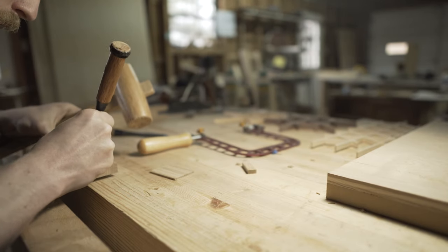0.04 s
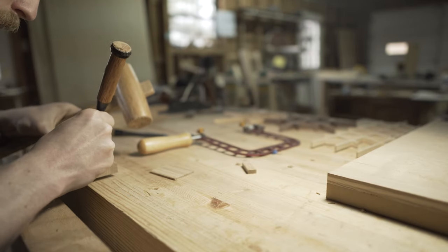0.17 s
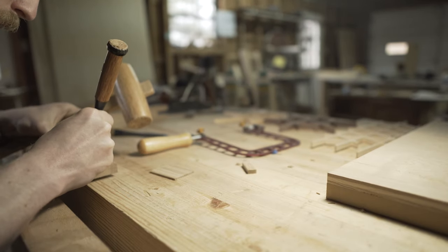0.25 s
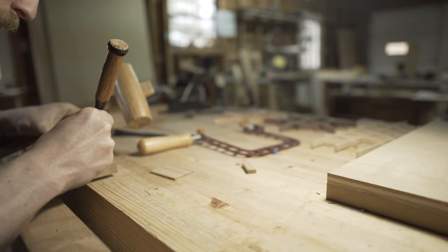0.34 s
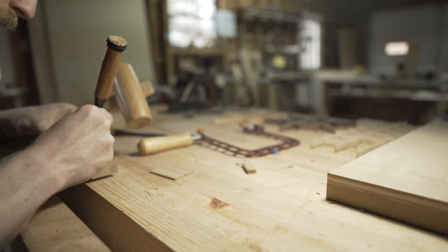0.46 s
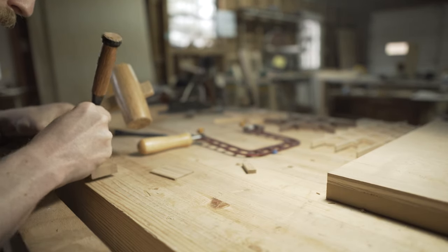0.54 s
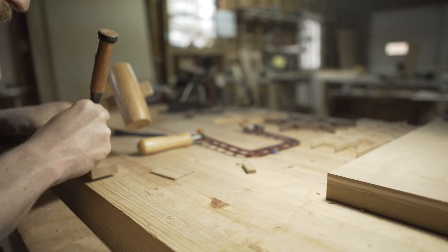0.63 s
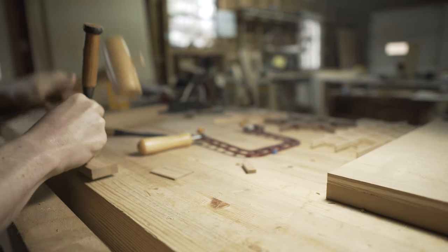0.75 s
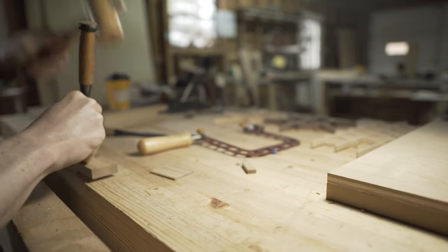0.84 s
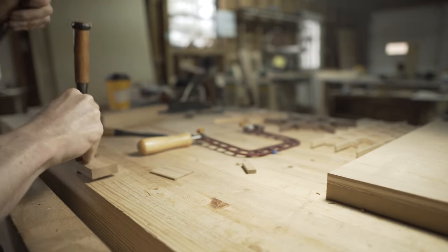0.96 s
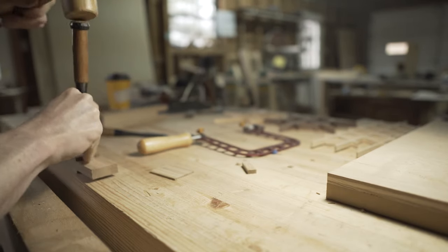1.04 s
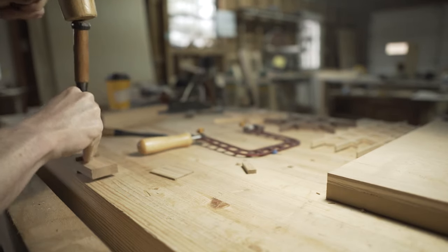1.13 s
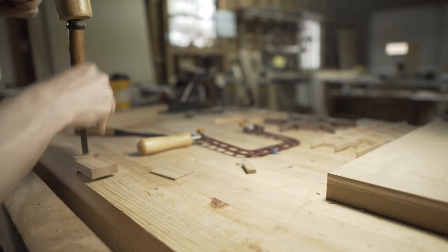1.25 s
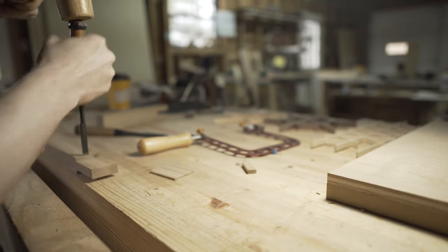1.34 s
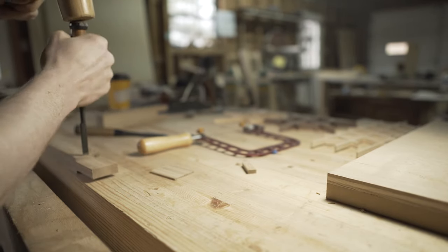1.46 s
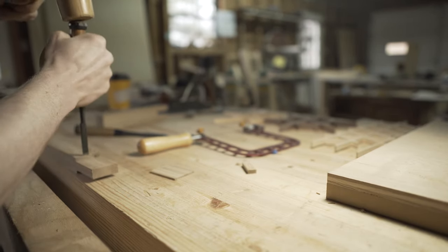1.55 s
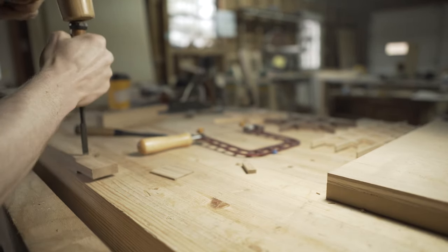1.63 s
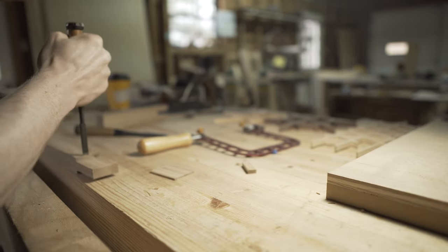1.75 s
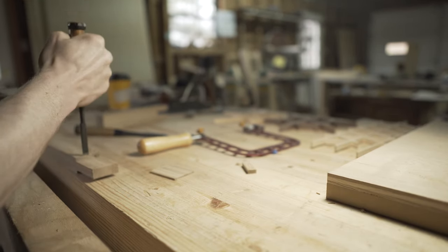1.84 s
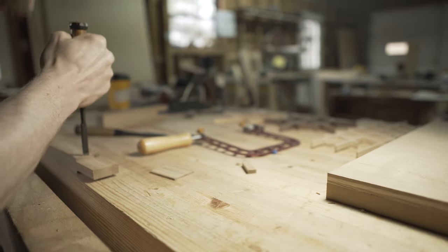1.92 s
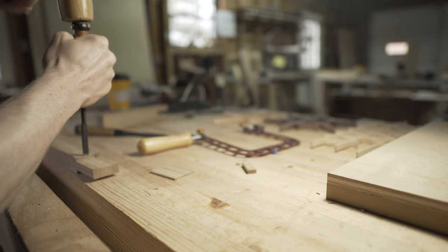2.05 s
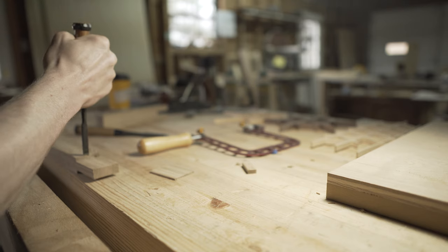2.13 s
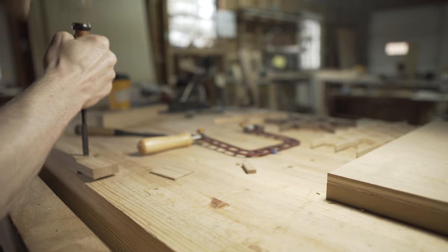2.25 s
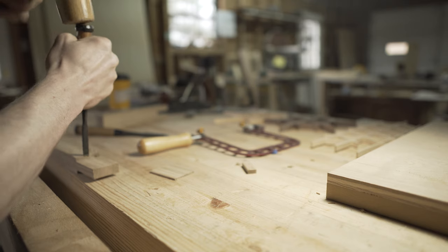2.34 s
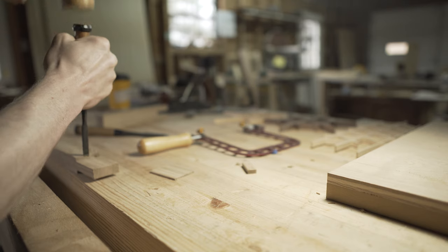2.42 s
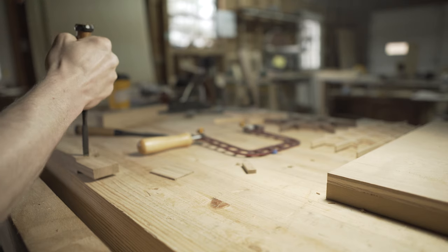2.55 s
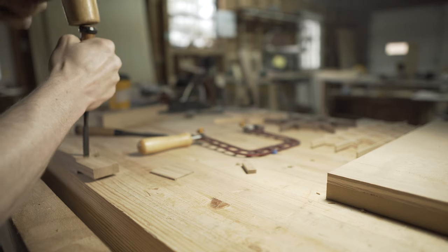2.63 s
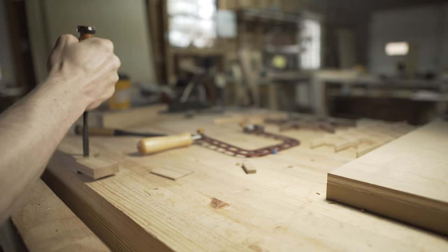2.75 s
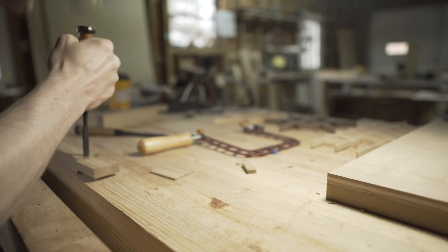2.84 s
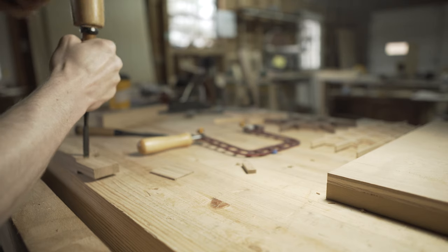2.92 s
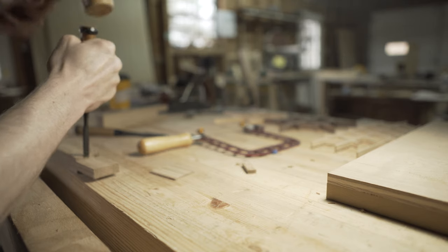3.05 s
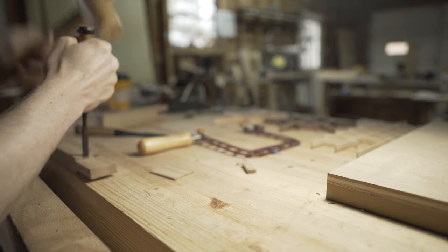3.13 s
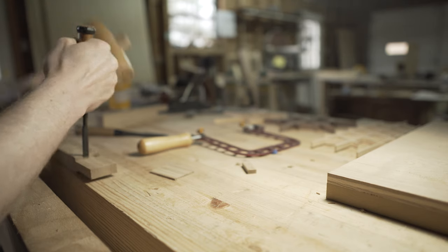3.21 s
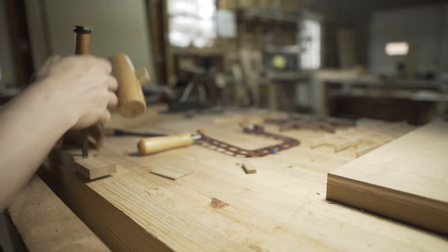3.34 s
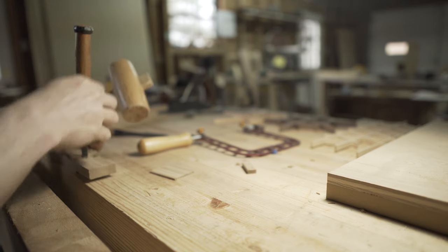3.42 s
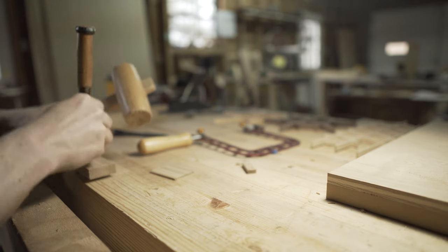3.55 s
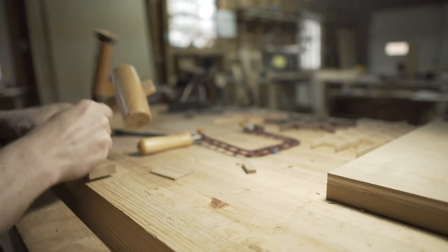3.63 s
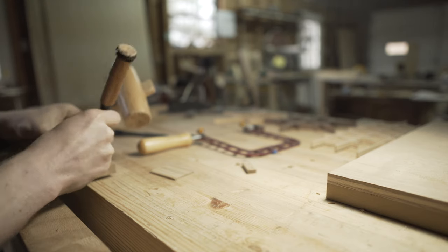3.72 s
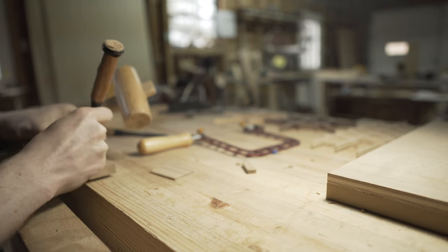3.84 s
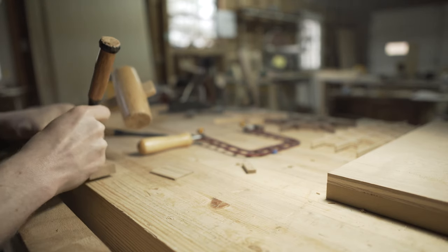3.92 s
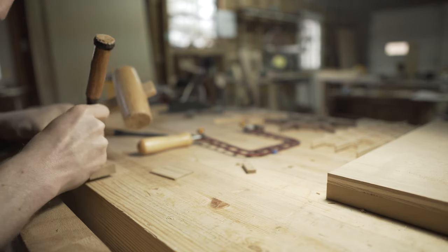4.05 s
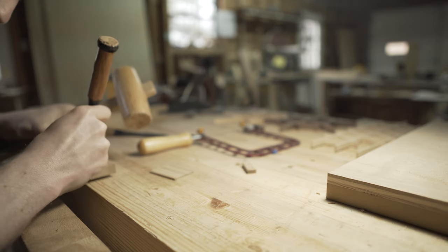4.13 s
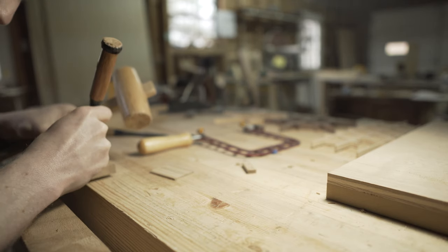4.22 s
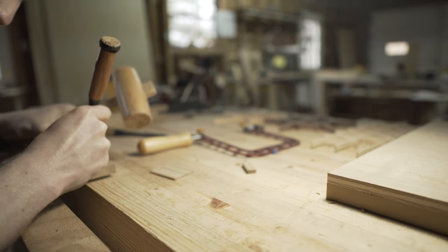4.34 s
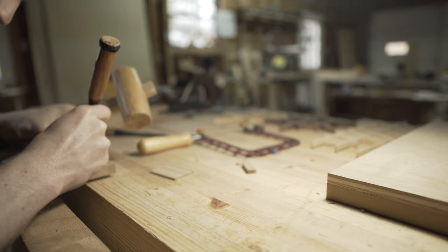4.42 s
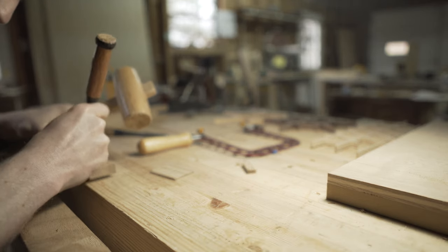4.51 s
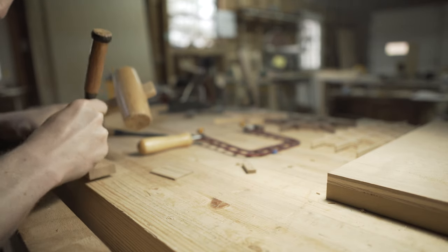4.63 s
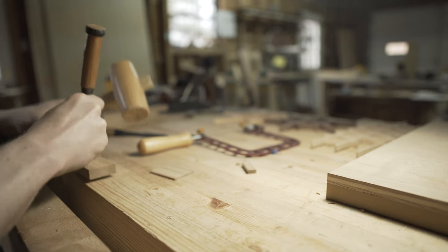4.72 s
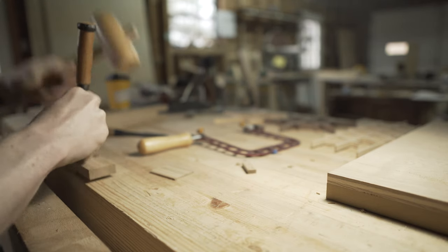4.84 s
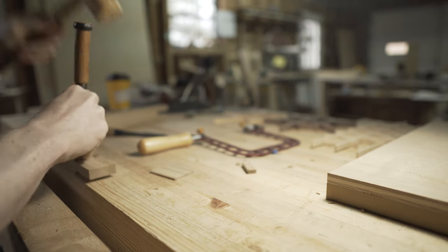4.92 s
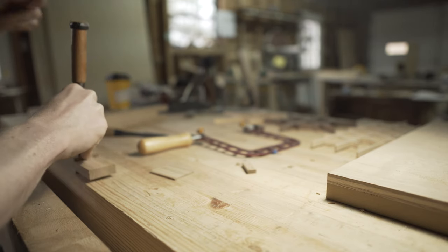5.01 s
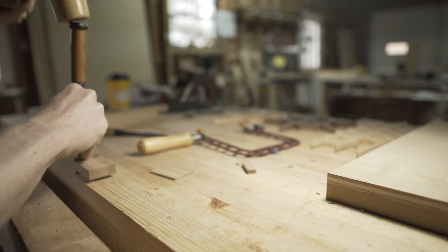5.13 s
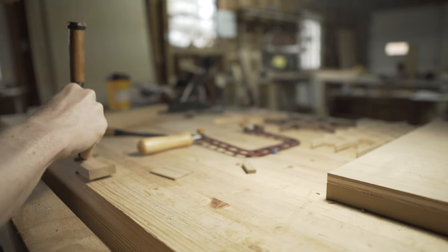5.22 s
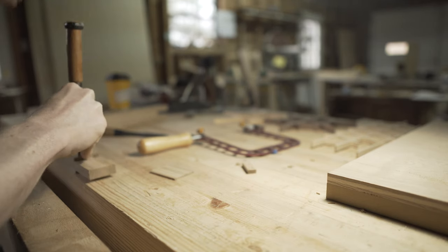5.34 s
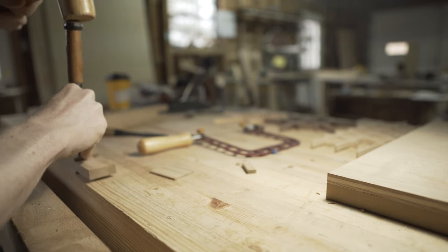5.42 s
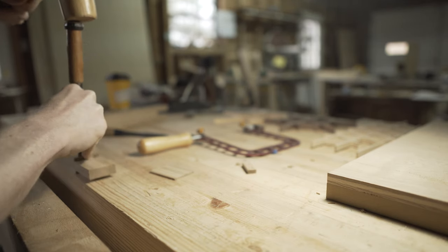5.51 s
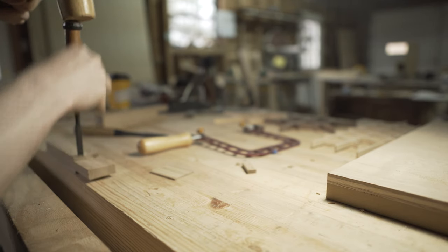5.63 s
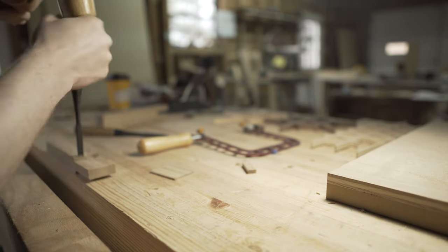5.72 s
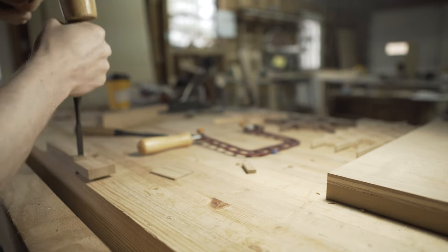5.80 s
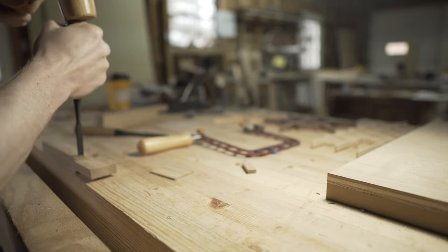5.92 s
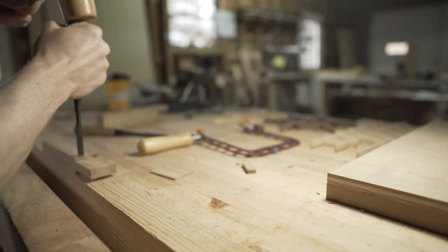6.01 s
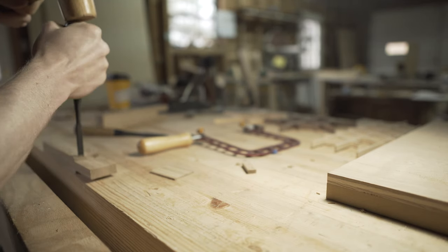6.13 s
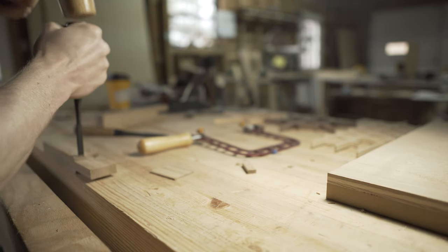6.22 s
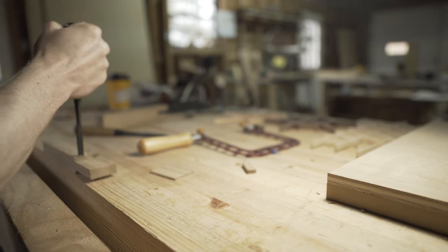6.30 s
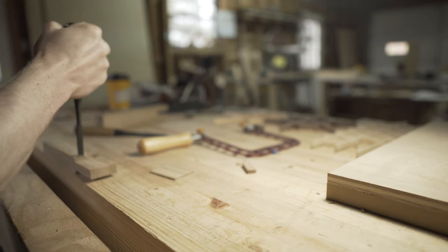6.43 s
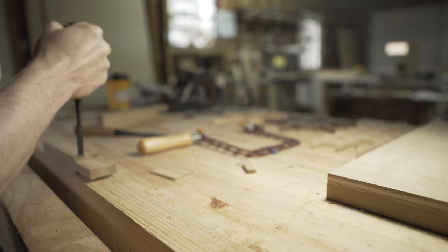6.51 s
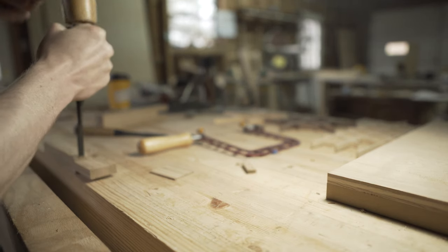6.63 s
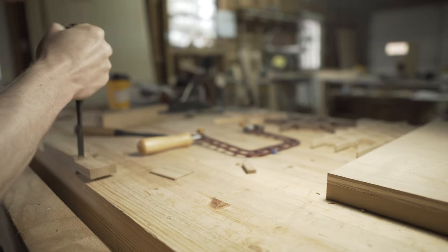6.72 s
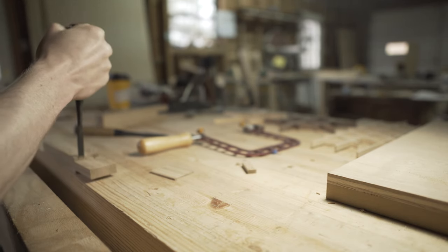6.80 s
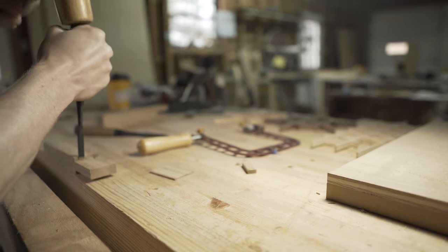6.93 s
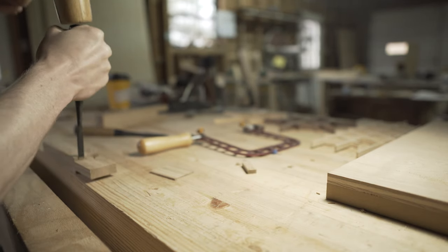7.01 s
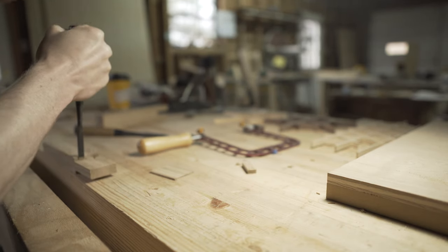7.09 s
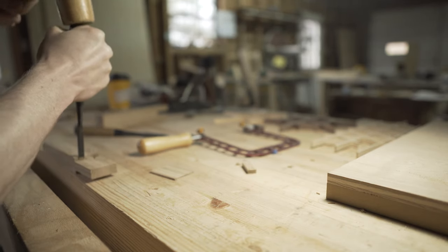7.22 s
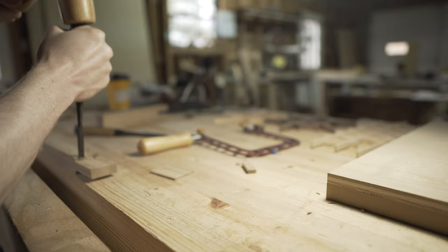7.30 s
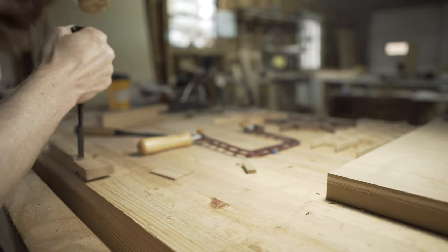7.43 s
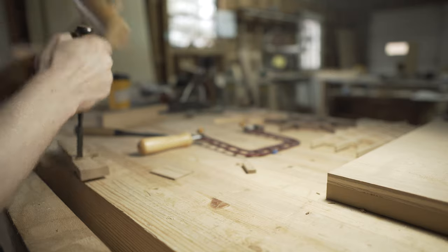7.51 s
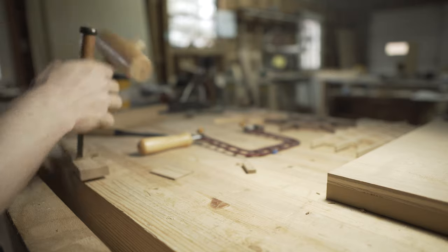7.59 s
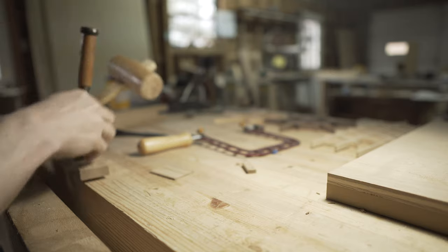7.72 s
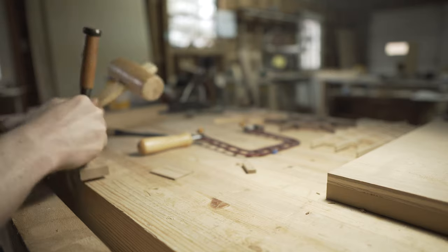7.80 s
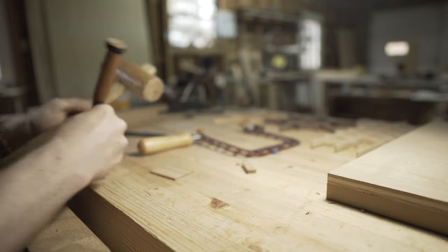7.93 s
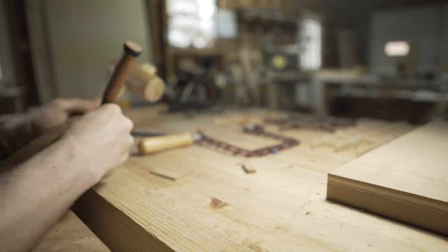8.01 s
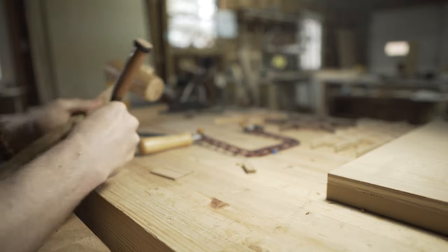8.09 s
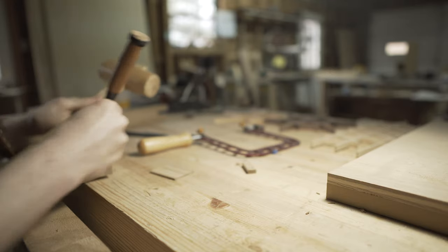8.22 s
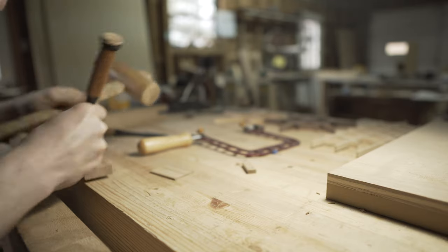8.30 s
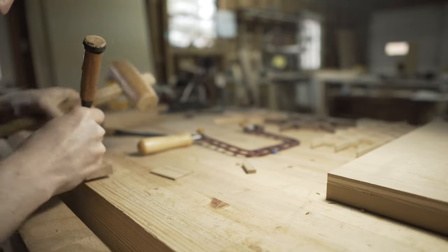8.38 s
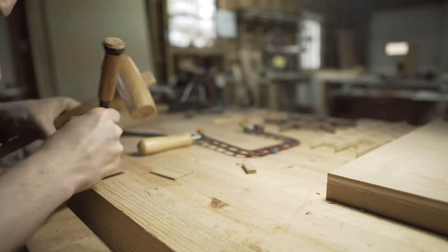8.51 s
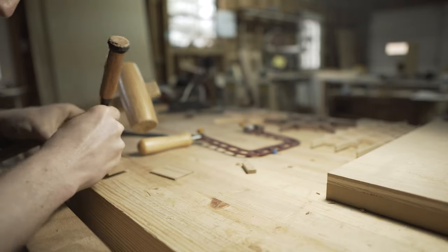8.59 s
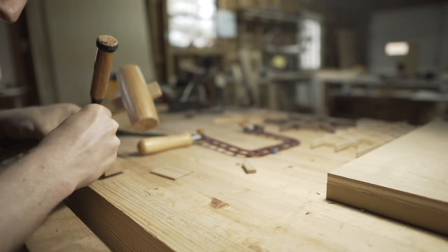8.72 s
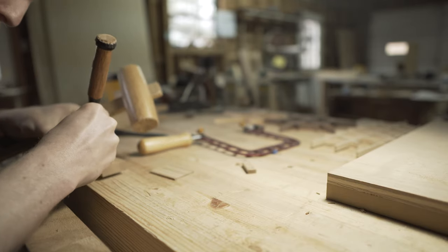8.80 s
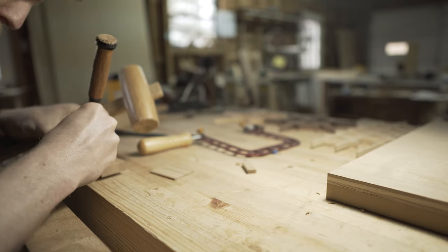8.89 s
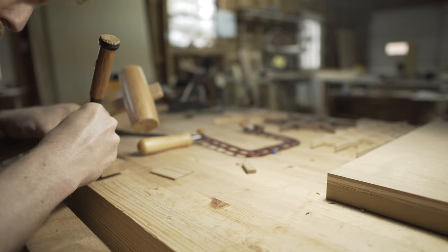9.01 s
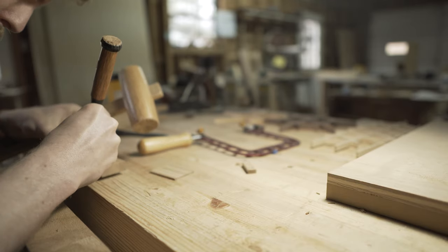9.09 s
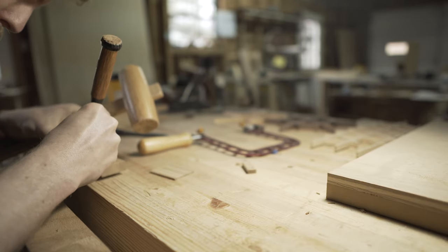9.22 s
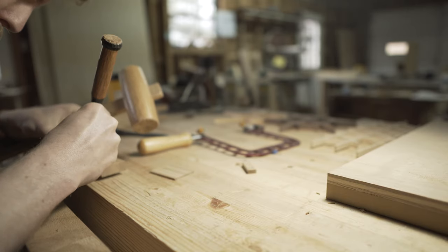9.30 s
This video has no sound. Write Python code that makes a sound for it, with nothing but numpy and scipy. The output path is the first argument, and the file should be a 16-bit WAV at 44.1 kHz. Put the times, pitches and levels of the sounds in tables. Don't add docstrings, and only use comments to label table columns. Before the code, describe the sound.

A large echoing workshop, close stereo microphones at the bench, with soft airy room tone and barely audible mains hum. In the first second there are tiny ticks, a hand rubbing tool and sleeve mostly at left, and a faint low bench groan. A dull wooden mallet blow lands at 1.1 s, with a stronger rub at 1.4, then a louder blow at 2.0 and quick brighter, clacking ones at 2.4, 2.7 and 2.95, the echo swelling after each. From 3.3 to 5 s it is quiet: a knock at 3.4, light taps, skin brushing. A soft, dull blow comes at 5.2, a fuller one at 5.5, a rub at 5.8, then brighter blows at 6.65, 7.0 and 7.3. The echo dies away; rustling and small taps follow around 8 s, then a modest knock at 8.7 with a short mallet scrape, leaving room tone.

```python
import sys
import numpy as np
from scipy import signal
from scipy.fft import rfft, irfft
from scipy.io import wavfile
from scipy.ndimage import uniform_filter1d

SR = 44100
rng = np.random.default_rng(int(sys.argv[2]) if len(sys.argv) > 2 else 0)


def field_ratio(decibels):
    return 10 ** (np.asarray(decibels, dtype=float) / 20)


def master(y):
    cut = np.clip(np.atleast_2d(y).T, -1, 1)
    pcm = np.round(cut * 32767)
    wavfile.write(sys.argv[1], SR, pcm.astype(np.int16))


N = 412335
SPAN = SR

# time in seconds, level in dB.
ROOM_TONE = [(0, -63), (.5, -63), (1.1, -61), (2.0, -61.5), (3.8, -71.5), (4.4, -72), (5.17, -64.5),
             (6.4, -64.5), (7.95, -69), (8.5, -66.5), (8.8, -61.5), (9.35, -63.5)]
# frequency in Hz, density in dB per Hz.
AIR = [(25, -19.5), (55, -3.5), (110, -19), (240, -13.5), (290, -16), (500, -8.5), (900, -8.5), (1500, -8),
       (2500, -11), (4000, -16.5), (7000, -23.5), (15600, -25), (16000, -56.5)]
# frequency in Hz, level in dB.
HUM = [(240, -81), (120, -92.5)]
# frequency in Hz, likeness 0 to 1.
AIR_ALIKE = [(60, 0.47), (180, 0.8), (550, 0.44), (1650, 0.47), (4970, 0.18), (15000, 0.23)]
ECHO_ALIKE = [(60, 0.79), (150, 1.0), (380, 0.98), (950, 0.82), (2380, 0.45), (5980, 0.2), (15000, 0.14)]
# frequency in Hz, density in dB per Hz.
SKIN = [(300, -35), (1500, -0.5), (4000, -2.5), (8000, -3), (12000, 0.5), (15600, -2.5), (16000, -35)]
# peak in seconds, length in seconds, level in dB,
# left over right in dB.
STROKES = [(0.803, 0.44, -60, 7.5), (.88, 0.079, -62.5, 12.5), (1.068, 0.16, -65, 8),
           (1.181, 0.14, -59, 10), (1.407, 0.28, -51.5, 4), (3.3, 0.13, -64, 3), (3.45, 0.29, -65.5, 7),
           (3.71, 0.45, -71.5, 8.5), (3.946, 0.2, -78, 7), (4.893, 0.38, -63, 6.5), (4.952, 0.056, -70, 7),
           (5.1, .15, -67, 5), (5.763, .2, -50, 4), (6.0, 0.26, -67.5, 7), (7.608, 0.16, -58.5, 8),
           (7.793, 0.52, -67.5, 8.5), (8.087, .12, -80, 5), (8.356, 0.27, -64.5, 7), (8.62, 0.25, -62.5, 8),
           (8.778, 0.21, -76, -1)]
# start in seconds, peak in dB, pitch in Hz,
# click in dB, ring t60 in seconds.
TICKS = [(0.1482, -53.5, 4230, -3, 0.0092), (0.6804, -51.5, 9700, -2.5, 0.013),
         (1.0425, -47.5, 4170, -7.5, 0.02), (3.3904, -43.5, 5540, -8, 0.0066),
         (3.4853, -56.5, 4260, -12, 0.01), (3.779, -43, 5300, -5, 0.012), (4.8731, -56, 11770, -17, 0.01),
         (4.943, -47, 12590, -9, 0.01), (5.0487, -50, 12200, -1.5, 0.011), (7.9899, -43.5, 5150, 3, 0.0048),
         (8.0537, -54, 8820, 6, 0.01), (8.675, -31.5, 5950, -8.5, 0.0065)]
KNOCKS = [(3.3907, -29, 1780, -9, 0.011), (3.785, -48.5, 548, -11, 0.038), (3.872, -56, 503, -19, 0.04),
          (4.101, -51, 570, -14.5, 0.029), (8.0793, -36.5, 1520, -23, 0.00594),
          (8.083, -55.5, 561, -27.5, 0.13), (8.6762, -38, 1125, -10.5, 0.23)]
# peak in seconds, length in seconds, level in dB.
GROAN = [
    (.67, 0.12, -70),
    (.875, 0.13, -61),
]
# peak in seconds, length in seconds, level in dB.
SLIDE = [
    (8.6, 0.14, -60),
]
# contact
# in seconds, strength in dB, hardness of contact in dB, thud in dB, # ring of the blade tip in dB.
BLOWS = [(1.116, -8.5, -22, -2.5, -24.5), (2.036, 1.5, -13.5, -9, -27.5), (2.367, -2.5, -2, -5, -10),
         (2.685, -3.5, -5.5, -8.5, -9), (2.953, -2, -7, -4.5, -10), (5.189, -10, -28.5, -3, -42),
         (5.488, -3, -15, -3, -16.5), (6.652, -2.5, -7.5, -7.5, -11.5), (7.014, -4, -3.5, -6, -12.5),
         (7.295, -2, -15.5, -6, -17), (8.675, -36, -13.5, -7.5, -23.5)]
# start in seconds, direct sound over echo in dB,
# bench gain in dB, handle mode in Hz, tip mode in Hz.
SEATS = [(1, -3, 4, 2100, 6100), (2, -6, 1.5, 2600, 6000), (5, -0.5, -1, 2250, 7350),
         (6.5, -5.5, -1, 2820, 7950), (8.5, 0.5, -4, 2600, 7500)]
# frequency in Hz, width in Hz, level in dB.
BENCH = [(131, 39, -12.5), (185.5, 45, -10.5), (248, 60, -5.5), (315, 24, -1), (387, 190, -6)]
HEAD = [(490, 130, -3.5), (570, 92, 3), (704, 98, 0.5), (800, 490, 0)]
MALLET = [(1108, 220, 14), (2000, 1600, -16.5)]
FACE = [(1457, 460, 6.5), (1670, 260, -3)]
HANDLE = [(1706, 430, 1.5), (2241, 340, 4), (2590, 200, -4), (2890, 890, -2.5)]
STEEL = [(3770, 700, 0.5), (4470, 730, 2.5), (5150, 700, -3.5), (6430, 300, -20)]
TIP = [(7200, 380, 2.5), (7780, 570, -1.5), (8850, 970, -8.5), (9970, 600, -2), (11100, 400, -11),
       (11500, 600, -10), (11800, 1200, -11.5), (13300, 1300, -6), (14440, 1000, -11), (15300, 800, -13.5)]
# level in dB at hardness 0, dB per dB of hardness.
BENCH_LAW = (-11.5, -.2)
FACE_LAW = (-5.5, .25)
HANDLE_LAW = (1.5, 0.68)
STEEL_LAW = (-.5, 0.93)
SEAT_LAW = (-5, 0.61)
SHANK_LAW = (-1, 1.6)
# frequency in Hz, t60 in seconds.
SHOP = [(100, 0.47), (260, 0.68), (700, 0.71), (1800, 0.64), (5000, 0.54), (9000, 0.41), (15000, 0.32)]
# frequency in Hz, width in Hz, level in dB.
STANDING = [(236, 2.6, -1), (322.7, 6.5, -1.5), (388.5, 16, -3), (518, 7, -6.5), (578, 5.1, 1.5),
            (662, 21, -1.5), (769, 8.1, 0), (1048, 6.3, 1.5), (1117.6, 24, -5.5), (1206, 9.8, -4.5),
            (1353, 67, -2), (1493, 48, -3.5)]
# frequency in Hz, left over right in dB.
LEAN = [(60, 4.5), (180, -2.5), (550, 0.0), (1650, 0.0), (4970, -0.5), (15000, 4.5)]

RUMBLE_HZ, RUMBLE_GROWS = 350, .3
RUSTLE_UNDER_DB, RUSTLE_GROWS, RUSTLE_PAN_DB = -10, 1.7, 4.5
RISE_SHARE, EDGE_DB = 0.45, 9.5
BENCH_PER_THUD, CRACK_DB, CRACK_PER_TIP = 0.73, -26, 0.36
SHANK_HZ, SHANK_WIDTH_HZ = 5150, 420
SEAT_WIDTH, SEAT_TIP_DB = 0.15, -4
CEILING_DB, GRIP, LISTEN_S = -24, 0.89, 0.023


def along(points, hz):
    f, v = np.transpose(points)
    return np.interp(np.log(hz + 1), np.log(f + 1), v)


def paired(spectra, alike, hz):
    turn = np.arccos(np.clip(along(alike, hz), -1, 1)) / 2
    mid, side = spectra[0] * np.cos(turn), spectra[1] * np.sin(turn)
    return np.array([mid + side, mid - side])


def rush(spectrum, alike, patchy_db):
    hz, _, z = signal.stft(rng.standard_normal((2, N)), SR, nperseg=512)
    patches = uniform_filter1d(rng.standard_normal(z.shape[1:]), 6, 0)
    patches = uniform_filter1d(patches, 10, 1)
    z = z * field_ratio(patchy_db * patches / patches.std() + along(spectrum, hz)[:, None])
    noise = signal.istft(paired(z, alike, hz[:, None]), SR, nperseg=512)[1][:, :N]
    return noise / noise.std()


def room_level_db():
    s, db = np.transpose(ROOM_TONE)
    return np.interp(np.arange(N) / SR, s, db)


def room_tone():
    t, air_db = np.arange(N) / SR, room_level_db()
    hum = sum(field_ratio(db) * np.sin(2 * np.pi * hz * t) for hz, db in HUM)
    air = rush(AIR, AIR_ALIKE, patchy_db=0.5)
    rumble = signal.sosfiltfilt(signal.butter(2, RUMBLE_HZ, fs=SR, output="sos"), air)
    air = air + rumble * (field_ratio(RUMBLE_GROWS * (air_db - air_db.max())) - 1)
    return field_ratio(air_db + 4.0) * air + field_ratio(air_db + 65.0) * hum


def swell(peak_s, length_s, db):
    since = np.arange(N) / SR - peak_s
    side_s = max(length_s, .02) * np.where(since < 0, RISE_SHARE, 1 - RISE_SHARE)
    return field_ratio(np.maximum(db - EDGE_DB * (since / side_s) ** 2, -200))


def rubbing():
    sides, air_db = np.array([[1], [-1]]), room_level_db()
    rustle_db = air_db.max() + RUSTLE_UNDER_DB + RUSTLE_GROWS * (air_db - air_db.max())
    power = field_ratio(rustle_db + sides * RUSTLE_PAN_DB) ** 2
    for s, length_s, db, pan_db in STROKES:
        power = power + (swell(s, length_s, db) * field_ratio(0.74 * sides * pan_db)) ** 2
    rub = np.sqrt(power) * rush(SKIN, [(1000, .8), (12000, 0.28)], patchy_db=2)
    rub[1] = np.roll(rub[1], shift=2)
    return rub


def near_bounce(dry):
    i = np.arange(200)
    edges = np.minimum(i / 12, (200 - i) / 60).clip(0, 1)
    bounce = rng.standard_normal(200) * edges * field_ratio(-i / 14)
    return signal.fftconvolve(dry, bounce / np.linalg.norm(bounce))[:SPAN]


def shop(dry, direct_db):
    i = np.arange(SPAN)
    hz, t, z = signal.stft(rng.standard_normal((2, SPAN)), SR, nperseg=256)
    early = 1 + 0.25 * field_ratio(-60 * t / 0.48)
    z = paired(z * early * field_ratio(-60 * t / along(SHOP, hz)[:, None]), ECHO_ALIKE, hz[:, None])
    lean_db = along(LEAN, hz)[:, None] / 2
    tail = signal.istft(z * field_ratio([lean_db, -lean_db]), SR, nperseg=256)[1][:, :SPAN]
    tail = tail * np.clip((i / SR - .002) / 0.0031, 0, 1)
    hz = np.fft.rfftfreq(SPAN, 1 / SR)
    standing = 1 + sum(field_ratio(db) * 1j * hz * w / (c * c - hz * hz + 1j * hz * w) for c, w, db in STANDING)
    tail_spectrum = rfft(tail / np.linalg.norm(tail[0]))
    echo = irfft(rfft(dry) * tail_spectrum * standing * (hz < 15900), SPAN)
    fade = np.minimum(1, 5 - 5 * i / SPAN) * (i > 60)
    return field_ratio(direct_db) * near_bounce(dry) + echo * fade


def add(out, sound, s):
    part = out[:, round(s * SR):][:, :SPAN]
    part += sound[:, :part.shape[1]]


def taps():
    out, t = np.zeros((2, N)), np.arange(SPAN) / SR
    for s, db, hz, click_db, t60 in TICKS + KNOCKS:
        ring = np.sin(2 * np.pi * hz * t) * field_ratio(-60 * t / max(t60, .004))
        click = field_ratio(click_db - 60 * t / 0.01) * rng.standard_normal(SPAN)
        gain = field_ratio(db - 6.5 + np.array([[1.5], [-1.5]]))
        add(out, gain * shop(ring + click, direct_db=3.5), s)
    return out


def drone(strokes, low_hz, high_hz):
    band = signal.butter(2, [low_hz, high_hz], "band", fs=SR, output="sos")
    x = signal.sosfilt(band, rng.standard_normal(N))
    return sum(swell(*stroke) for stroke in strokes) * x / x.std()


def bench_groan():
    return drone(GROAN, low_hz=120, high_hz=147)


def peak(hz, centre_hz, width_hz):
    sharpness = 2.1
    width = (hz * width_hz) ** 2
    return (width / ((centre_hz ** 2 - hz ** 2) ** 2 + width)) ** sharpness


def body(modes, hz, scatter_db):
    power = sum(field_ratio(db + scatter_db * rng.standard_normal()) ** 2 * peak(hz, c, w) for c, w, db in modes)
    return power / power.mean()


def struck(power):
    cepstrum = irfft(np.log(power + 1e-12) / 2, SPAN)
    cepstrum[1:SPAN // 2] *= 2
    cepstrum[SPAN // 2:] = 0
    return irfft(np.exp(rfft(cepstrum)), SPAN)


def blow_power(hz, seat, hard_db, thud_db, tip_db):
    _, _, seat_db, handle_hz, tip_hz = seat

    def answer_db(law):
        return law[0] + law[1] * hard_db

    bench_db = answer_db(BENCH_LAW) + seat_db + BENCH_PER_THUD * thud_db
    parts = [(BENCH, bench_db, 1.5), (HEAD, thud_db, 1.5), (MALLET, -4.5, 1),
             (FACE, answer_db(FACE_LAW), 1.5), (HANDLE, answer_db(HANDLE_LAW), 2),
             (STEEL, answer_db(STEEL_LAW), 2.2), (TIP, tip_db, 3.5)]
    power = sum(field_ratio(db) ** 2 * body(modes, hz, scatter_db) for modes, db, scatter_db in parts)
    single_modes = [(handle_hz, SEAT_WIDTH * handle_hz, answer_db(SEAT_LAW)),
                    (tip_hz, SEAT_WIDTH * tip_hz, tip_db + SEAT_TIP_DB),
                    (SHANK_HZ, SHANK_WIDTH_HZ, answer_db(SHANK_LAW))]
    for mode_hz, width_hz, db in single_modes:
        mode = peak(hz, mode_hz, width_hz)
        power = power + field_ratio(db) ** 2 * mode / mode.mean()
    return power


def fibre_crack(tip_db):
    t = np.arange(SPAN) / SR
    burst = rng.standard_normal((2, SPAN)) * np.exp(-((t - .0007) / .0012) ** 2)
    return burst * field_ratio(CRACK_DB + CRACK_PER_TIP * tip_db + np.array([[4], [-4]]))


def mallet_blows():
    out, hz = np.zeros((2, N)), np.fft.rfftfreq(SPAN, 1 / SR)
    for s, db, hard_db, thud_db, tip_db in BLOWS:
        seat = [seat for seat in SEATS if seat[0] < s][-1]
        ring = struck(blow_power(hz, seat, hard_db, thud_db, tip_db))
        blow = shop(ring, direct_db=seat[1]) + fibre_crack(tip_db)
        add(out, field_ratio(db + 25) * blow, s - .0003)
    return out


def mallet_drag():
    return drone(SLIDE, low_hz=530, high_hz=721)


def scene():
    return room_tone() + rubbing() + taps() + bench_groan() + mallet_blows() + mallet_drag()


def roll_off(x):
    return signal.sosfilt(signal.butter(12, 17080, fs=SR, output="sos"), x)


def record(dry):
    t, gain_db = np.arange(N) / SR, np.zeros(N)
    cut = signal.sosfilt(signal.butter(2, 115, "high", fs=SR, output="sos"), dry)
    cut = signal.sosfilt(signal.butter(12, 16300, fs=SR, output="sos"), cut)
    for s, *_ in BLOWS:
        heard = cut[:, round(s * SR):round((s + LISTEN_S) * SR)]
        level_db = 10 * np.log10(np.mean(heard ** 2))
        since = np.maximum(t - s + .003, 0)
        clamp = np.minimum(since / 0.0016, 1) * np.exp(-(since / 0.062) ** 1.23)
        gain_db -= GRIP * max(level_db - CEILING_DB, 0) * clamp
    return roll_off(cut * field_ratio(gain_db))


dry = scene()
out = record(dry)
master(out)
```